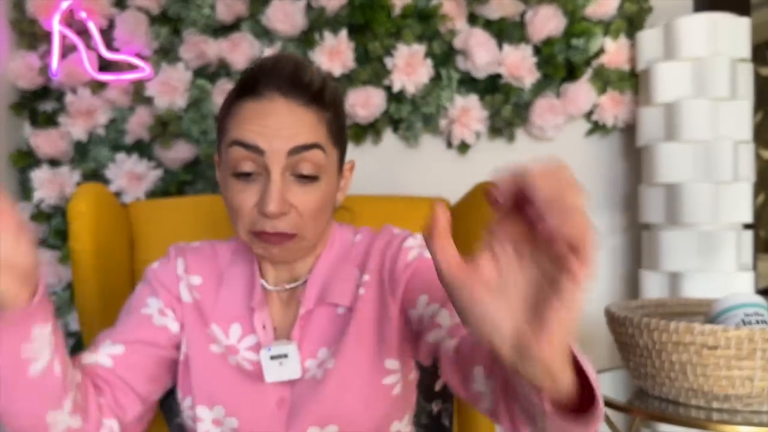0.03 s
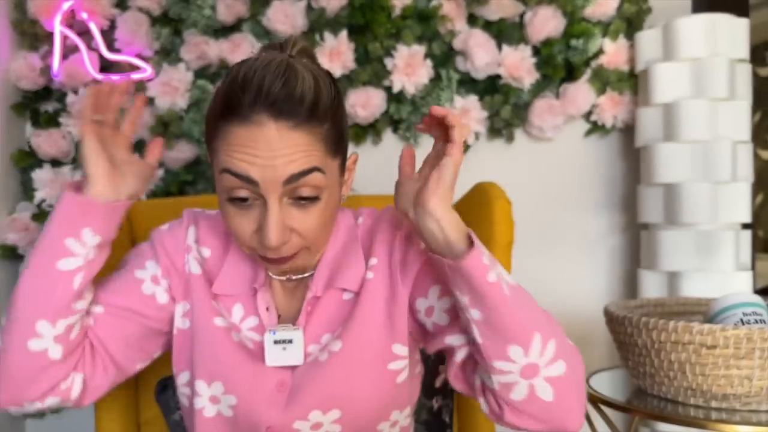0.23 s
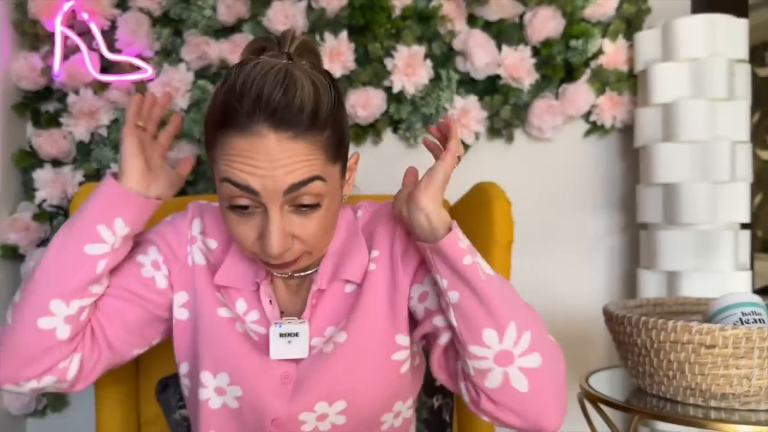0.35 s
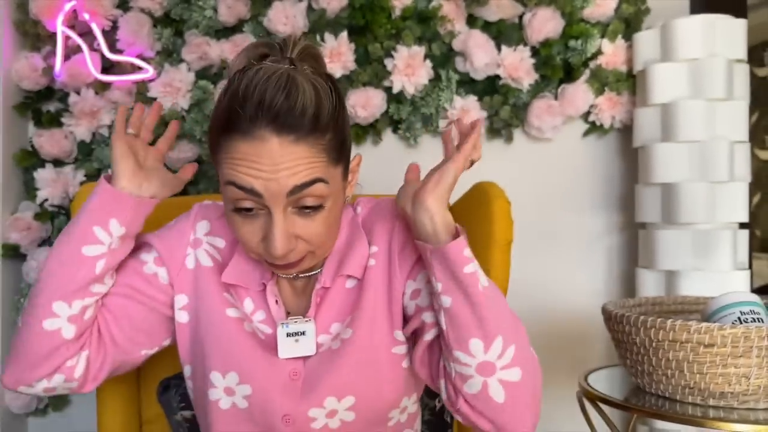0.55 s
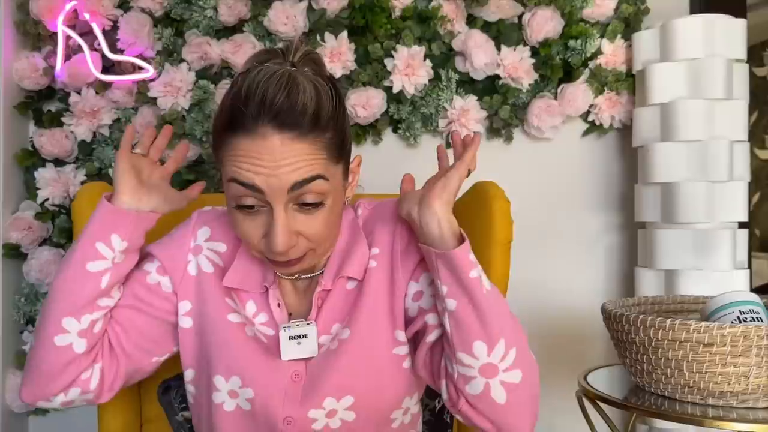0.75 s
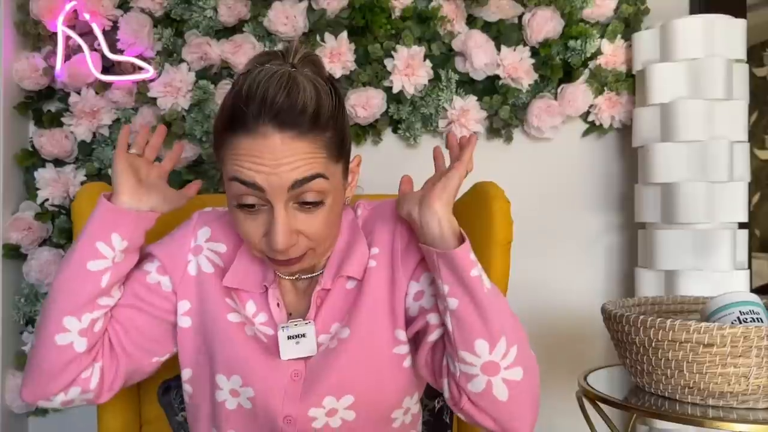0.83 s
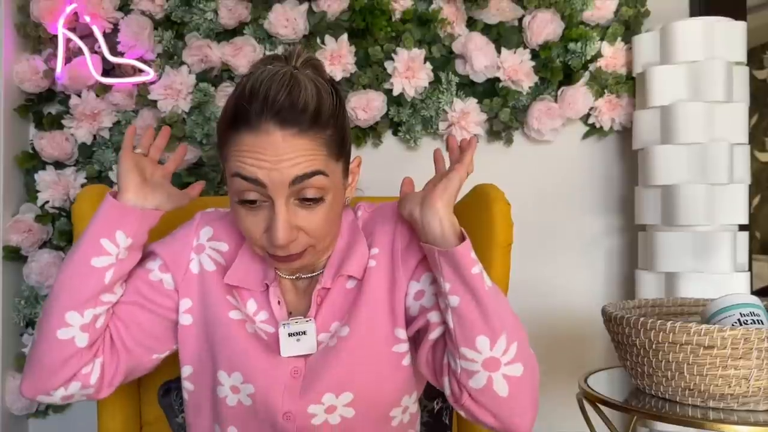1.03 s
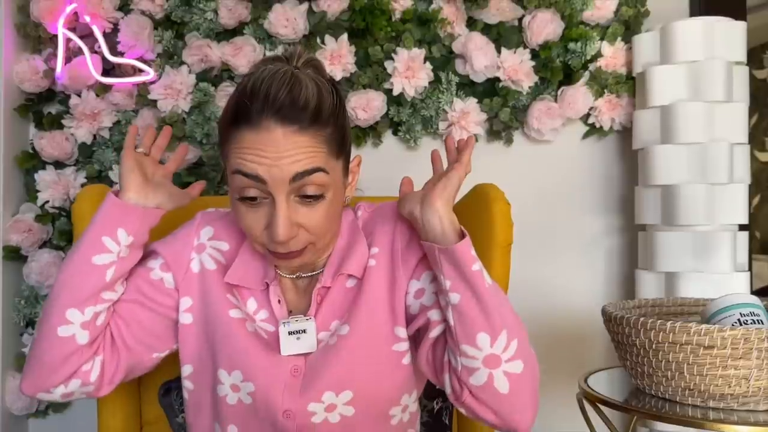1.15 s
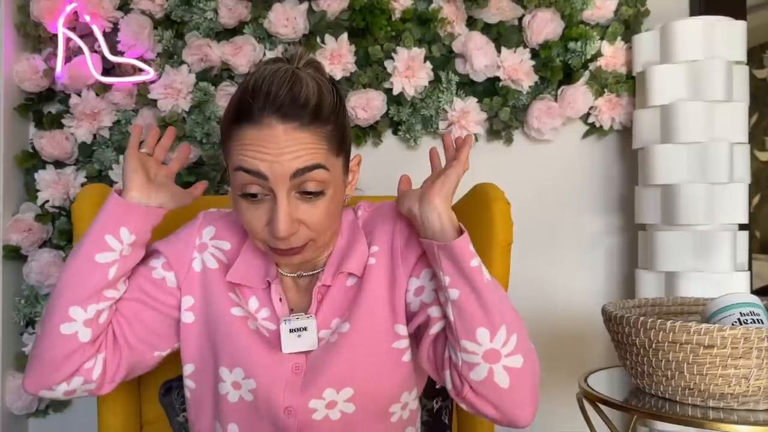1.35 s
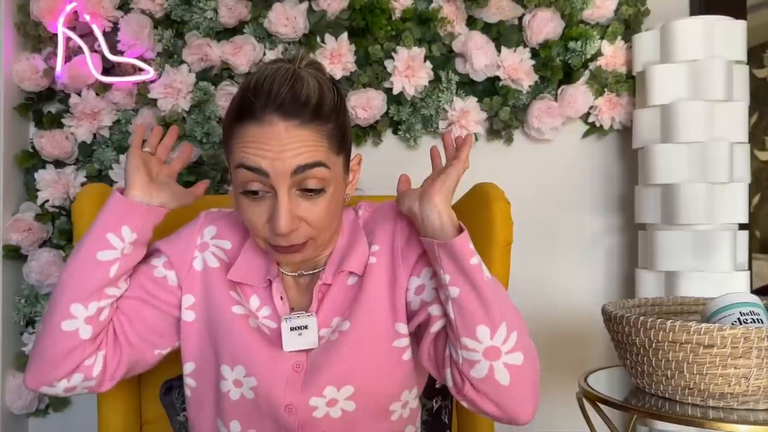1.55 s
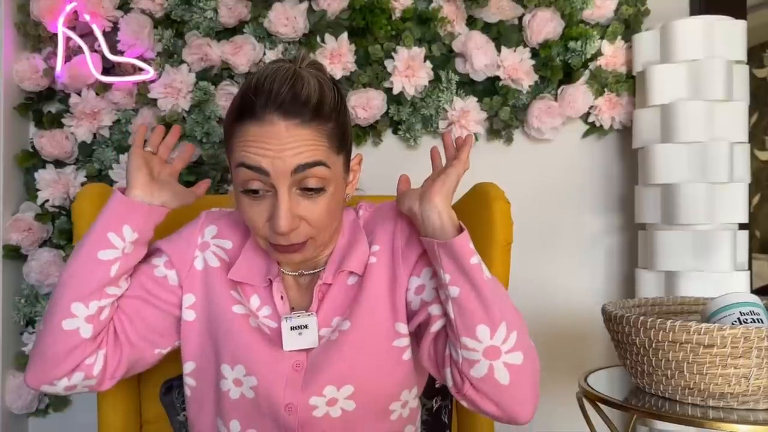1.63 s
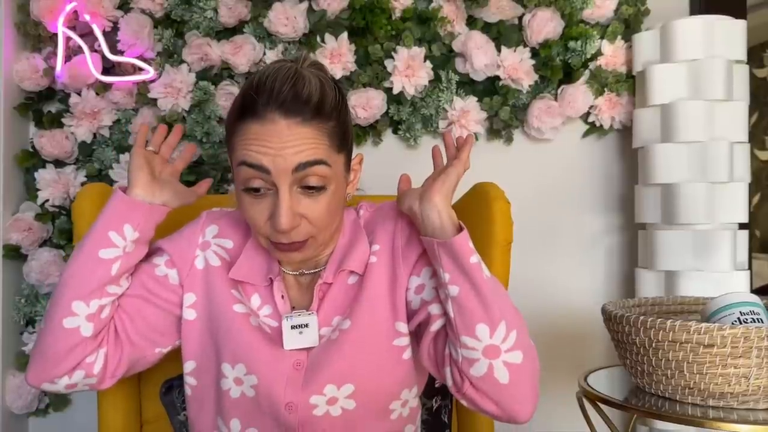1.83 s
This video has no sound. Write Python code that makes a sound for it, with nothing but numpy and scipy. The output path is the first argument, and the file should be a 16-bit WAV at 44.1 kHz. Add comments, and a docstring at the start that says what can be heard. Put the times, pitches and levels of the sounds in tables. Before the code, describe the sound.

A small glass bottle strikes a hollow wooden floor at about 0.22 s, a loud, sharp, woody crack that overloads the close microphone, with rapid shuddering and a thin glassy ring. A lighter, glassier bounce comes at 0.69 s, then duller knocks near 0.84 and 0.97 s. Small rolling taps and knocks from 1.28 to 1.6 s settle into lively room reverberation over faint air noise; a low rumble fades early.

```python
"""Hollow wooden floor, lively room: a small glass bottle falls, overloads a near microphone, bounces,
rolls and knocks to rest. Each blow is dying sines for boards, base, body and wall, plus a noise tick;
paired sines make the glass ring now and then. Sparse noise tails stretch it all into a long room tail.
Behind it: steady air noise and a low rumble that dies away."""
import sys
import numpy as np
from scipy import signal
from scipy.fft import rfft, irfft
from scipy.io import wavfile

SR = 44100
rng = np.random.default_rng(int(sys.argv[2]) if len(sys.argv) > 2 else 0)


def waveform_to_disk(signal):
    """Save audio, clipped to [-1, 1], as 16-bit WAV at the path in sys.argv[1]."""
    frames = np.transpose(np.atleast_2d(signal))
    scaled = np.clip(frames, -1, 1) * 32767
    samples = np.round(scaled).astype(np.int16)
    wavfile.write(sys.argv[1], SR, samples)


N = 83790

# Bounces, relative levels: (time [s], boards thud [dB], base knock [dB], body knock [dB],
# wall clack [dB], tick [dB])
BLOW_EVENTS = [(0.2222, 7, 4, -3, 7.5, -5.5), (.2260, 4, 1, -9, 5, -11), (0.2344, -2, -5, -27, -34, -33.5),
               (0.2454, -1, -16.5, -32.5, -37, -30), (0.2557, 0, -8.5, -31.5, 0.5, -33),
               (0.3051, -6.5, -29, -19, -59, -59), (.6900, -16, -3, 2.5, -13, -8),
               (0.7235, -32, -43, -5, -24, -15.5), (0.7456, -29, -37.5, -42, -29, -49),
               (.8358, -12.5, -18, -11, -22.5, -21), (.9630, 1, -23.5, -17, -13, -29),
               (.9800, -7, -9.5, -18, -27.5, -31), (1.2814, -8, -37, -39.5, -23, -28),
               (1.3033, -7, -13.5, -17.5, -9.5, -45.5), (1.3189, -20, -11.5, -21, -27.5, -42),
               (1.372, -8, -31, -49, -42, -48), (1.4470, -11, -19.5, -15, -23, -40),
               (1.5287, -12, -25.5, -24.5, -26, -62), (1.581, -1, -38, -34, -30, -50.5)]
# Floorboard modes: (mean frequency [Hz], mean relative level [dB], t60 [s])
BOARD_MODES = [(99, -37, 0.046), (190.4, -11.5, 0.048), (270.6, -5.5, 0.063), (303.9, -2.5, 0.064),
               (330.7, 3.5, 0.02), (389.2, -8, 0.054), (464.4, -5, 0.052), (534, -4.5, 0.052),
               (640.6, -9, 0.034), (846, -9.5, 0.028)]
# Bottle base modes: (mean frequency [Hz], mean relative level [dB], t60 [s])
BASE_MODES = [(1065, 2, 0.019), (1365, 5.5, 0.011), (1679, 7, 0.013)]
# Bottle body modes: (mean frequency [Hz], mean relative level [dB], t60 [s])
BODY_MODES = [(1919, 0.5, 0.021), (2074, 1.5, 0.014), (2290, -5.5, 0.029), (2451, -9.5, 0.0092)]
# Bottle wall modes: (mean frequency [Hz], mean relative level [dB], t60 [s])
WALL_MODES = [(2750, -6, .008), (3100, -2, .008), (3500, 0, .01), (3900, -5, .007), (4400, -8, .007),
              (5350, -11, .009)]
# Contact tick spectrum: (frequency [Hz], relative level [dB])
TICK_SPECTRUM = [(500, -35.5), (2000, -3.5), (5200, 20), (6500, -6), (8000, -15.5), (12000, -35.5)]
# Glass ring onsets: (time [s], frequency [Hz])
RING_ONSETS = [(.224, 5422), (.692, 4593), (.691, 5605), (.965, 5700), (1.304, 5420)]
# Glass ring decays, row for row with the onsets:
# (level [dB], t60 [s], twin offset [Hz], twin relative level [dB])
RING_DECAYS = [(-24, .5, 40, -5), (-23, .33, 32, -10), (-27, .2, 21, -9), (-41, .2, 31, -6),
               (-34, .04, 31, -6)]
# Spells of small taps: (start [s], end [s], rate [taps/s], boards [dB], base and body [dB],
# wall [dB], level slope [dB/s])
TAP_SPELLS = [(.23, 0.653, 108.3, -4, -12, -13.5, -60), (0.968, 1.2, 90, -10, -21.5, -25.5, -67.5),
              (1.31, 1.588, 110, -15.5, -25.5, -28.5, -20)]
# Room decay: (frequency [Hz], t60 [s])
ROOM_T60 = [(100, 0.52), (300, 0.66), (600, 1), (1500, 0.75), (4000, 0.64), (8000, 0.45)]
# Room tail colour: (frequency [Hz], relative level [dB])
ROOM_LEVEL = [(100, -7.5), (300, 2), (700, 2.5), (1200, 0), (2000, -5.5), (3200, -3.5), (5000, -7.5),
              (9000, 8)]
# Room air spectrum: (frequency [Hz], relative density [dB per Hz])
AIR_SPECTRUM = [(20, -18), (55, -5), (125, 0.5), (390, -0.5), (800, -11), (1340, -18), (2000, -17),
                (4500, -25), (8100, -31.5), (9500, -45.5)]
# Fading rumble spectrum: (frequency [Hz], relative density [dB per Hz])
RUMBLE_SPECTRUM = [(40, -41), (80, -10), (280, -8.5), (400, -2), (600, -12.5), (1200, -16.5), (2500, -33)]

DETUNE_RATIO, WEIGHT_SPREAD_DB, PHASE_SPREAD_RAD = 0.034, 1.86, 0.64  # standard deviations
RISE_CYCLES = 0.75  # swell of each mode
TICK_T60_S, TICK_RISE_S, RING_RISE_S = 0.019, 0.00054, 0.0028
TAP_RANGE_DB = 5.9
ROOM_DELAY_S, TURN_S = .003, 1.2  # TURN_S: half cycle of each tail's share
BASS_CUT_HZ = 59
AIR_DB, RUMBLE_START_DB, RUMBLE_T60_S = -46, -41.5, 0.64  # ahead of the microphone drive
DRIVE_DB, MIC_HZ, EDGE_HZ = 2.97, 9400, 16640
KNEE = .8  # of full scale


def amp(db):
    """Decibels to amplitude ratio."""
    return 10 ** (np.asarray(db, float) / 20)


def evened(x):
    """Scale to unit RMS."""
    return x / np.sqrt(np.mean(x ** 2) + 1e-20)


def read(points, hz):
    """Interpolate a table over log frequency."""
    f, value = np.transpose(points)
    return np.interp(np.log(hz + 1), np.log(f + 1), value)


def add(mix, time_s, sound):
    """Mix a sound in at a time, cut at the end."""
    part = mix[round(time_s * SR):][:len(sound)]
    part += sound[:len(part)]


def coloured(points, size):
    """Unit-RMS noise with the given spectrum."""
    hz = np.fft.rfftfreq(size, 1 / SR)
    spectrum = rfft(rng.standard_normal(size)) * amp(read(points, hz))
    return evened(irfft(spectrum, size))


def struck(modes, db):
    """Dying sines with a soft start, detuned and reweighted at random, as each blow lands elsewhere."""
    hz, level_db, t60_s = np.transpose(modes)[:, :, None]
    detune, weight, phase = rng.standard_normal((3, len(modes), 1))
    t = np.arange(SR // 6) / SR
    decay = amp(level_db + WEIGHT_SPREAD_DB * weight - 60 * t / t60_s)
    rise = 1 - np.exp(-(t * hz / RISE_CYCLES) ** 2)
    mode_hz = hz * (1 + DETUNE_RATIO * detune)
    sines = np.sin(2 * np.pi * mode_hz * t + PHASE_SPREAD_RAD * phase)
    return amp(db) * (decay * rise * sines).sum(0) / 2


def blows():
    """Each bounce excites boards, base, body and wall modes, plus a noise tick."""
    out, t = np.zeros(N), np.arange(1024) / SR
    tick_rise = 1 - np.exp(-t / TICK_RISE_S)
    for time_s, thud_db, base_db, body_db, clack_db, tick_db in BLOW_EVENTS:
        thud = struck(BOARD_MODES, thud_db)
        knock = struck(BASE_MODES, base_db) + struck(BODY_MODES, body_db)
        clack = struck(WALL_MODES, clack_db)
        add(out, time_s, thud + knock + clack)
        tick = coloured(TICK_SPECTRUM, len(t)) * amp(tick_db - 60 * t / TICK_T60_S)
        add(out, time_s, tick * tick_rise)
    return out


def rings():
    """Long thin glass tones, each beating with a close twin."""
    out, t = np.zeros(N), np.arange(SR // 2) / SR
    rise = 1 - np.exp(-t / RING_RISE_S)
    for (time_s, hz), (db, t60_s, beat_hz, twin_db) in zip(RING_ONSETS, RING_DECAYS):
        tone = np.sin(2 * np.pi * hz * t)
        twin = amp(twin_db) * np.sin(2 * np.pi * (hz + beat_hz) * t)
        add(out, time_s, amp(db - 60 * t / t60_s) * rise * (tone + twin))
    return out


def roll():
    """Small uneven taps, randomly spaced, as the bottle shudders, rolls and rocks after a blow."""
    out = np.zeros(N)
    for start_s, end_s, rate, boards_db, body_db, wall_db, slope_db_s in TAP_SPELLS:
        draws = rng.random((60, 2))
        gaps_s = -np.log(1 - draws[:, 0]) / rate  # exponential gaps
        for since_s, softness in zip(np.cumsum(gaps_s), draws[:, 1]):
            if start_s + since_s >= end_s:
                break
            tap = struck(BOARD_MODES, boards_db) + struck(WALL_MODES, wall_db)
            tap += struck(BASE_MODES + BODY_MODES, body_db)
            add(out, start_s + since_s, tap * amp(slope_db_s * since_s - TAP_RANGE_DB * softness))
    return out


def room(x):
    """Sparse taps of random sign, each band dying at its own speed; three tails take turns."""
    out, t = np.zeros(N), np.arange(N) / SR
    for k in range(3):
        taps, slots = np.zeros(SR), np.arange(0, SR - 20, 20)
        taps[slots + rng.integers(0, 20, len(slots))] = rng.choice([-1., 1.], len(slots))
        hz, frame_s, bands = signal.stft(taps, SR, nperseg=256)
        bands = bands * amp(-60 * frame_s / read(ROOM_T60, hz)[:, None])
        bands = bands / np.sqrt((abs(bands) ** 2).sum(1, keepdims=True))  # equal energy per band
        norm = np.linalg.norm(signal.istft(bands, SR, nperseg=256)[1])
        bands = bands * amp(read(ROOM_LEVEL, hz))[:, None]
        tail = signal.istft(bands, SR, nperseg=256)[1] / norm
        tail = np.r_[np.zeros(round(ROOM_DELAY_S * SR)), tail]
        share = np.sqrt(2 / 3) * np.cos(np.pi * (t / TURN_S + k / 3))  # squares sum to 1
        out += signal.fftconvolve(x * share, tail)[:N]
    return out


def background():
    """Steady room air noise and a low rumble decaying exponentially from the start."""
    t = np.arange(N) / SR
    air = amp(AIR_DB) * coloured(AIR_SPECTRUM, N)
    rumble = amp(RUMBLE_START_DB - 60 * t / RUMBLE_T60_S) * coloured(RUMBLE_SPECTRUM, N)
    return air + rumble


def scene():
    """Bottle and its room tail, high-passed, over the background."""
    bottle = blows() + rings() + roll()
    bass_cut = signal.butter(2, BASS_CUT_HZ, "high", fs=SR, output="sos")
    bottle = signal.sosfilt(bass_cut, bottle + room(bottle))
    return (bottle + background())[None]


def record(dry):
    """Microphone low-pass, overload flattening peaks and adding treble, then the band limit."""
    def low(x, hz):
        taps = signal.firwin(511, hz, window=("kaiser", 9), fs=SR)
        return signal.oaconvolve(x, taps[None], "same")
    x = amp(DRIVE_DB) * low(dry, MIC_HZ)
    over = np.maximum(abs(x) - KNEE, 0)
    bent = (1 - KNEE) * np.tanh(over / (1 - KNEE))
    x = np.sign(x) * (np.minimum(abs(x), KNEE) + bent)
    return np.clip(low(x, EDGE_HZ), -1, 1)


dry = scene()
out = record(dry)
waveform_to_disk(out)
```